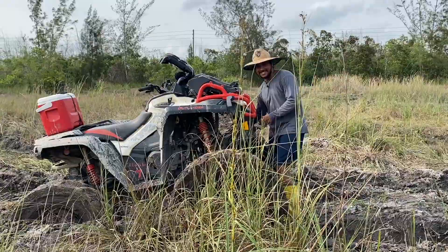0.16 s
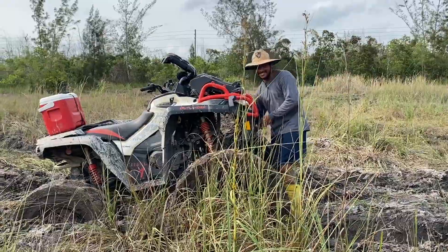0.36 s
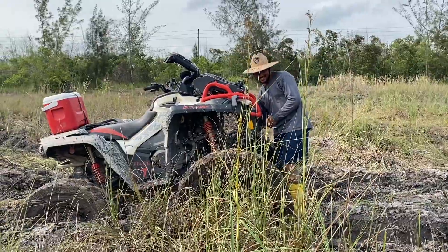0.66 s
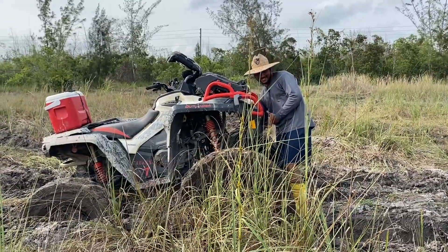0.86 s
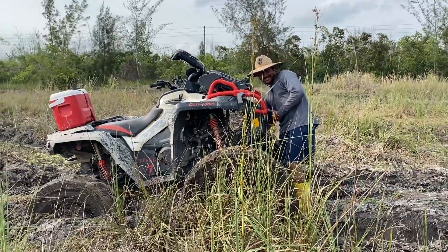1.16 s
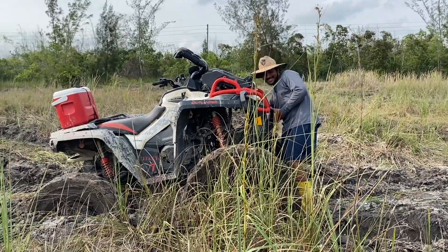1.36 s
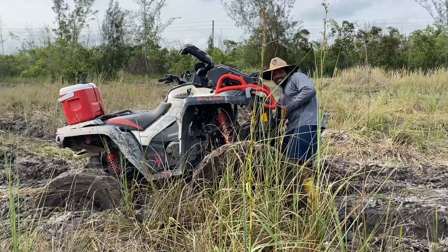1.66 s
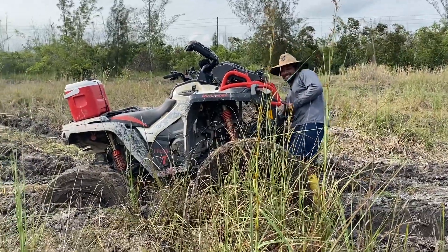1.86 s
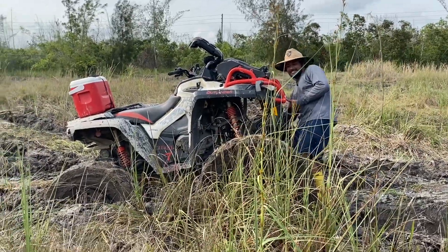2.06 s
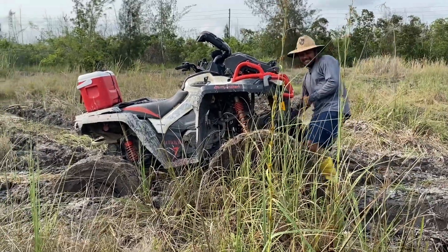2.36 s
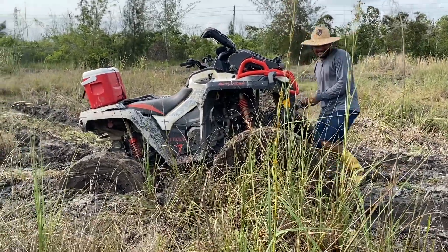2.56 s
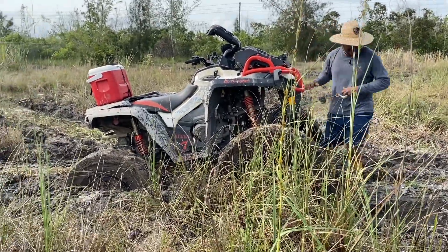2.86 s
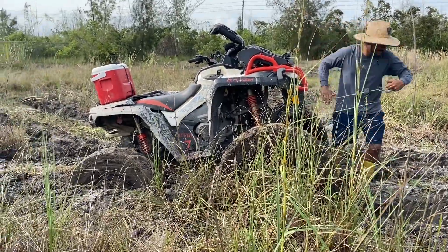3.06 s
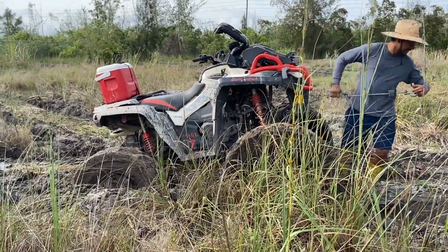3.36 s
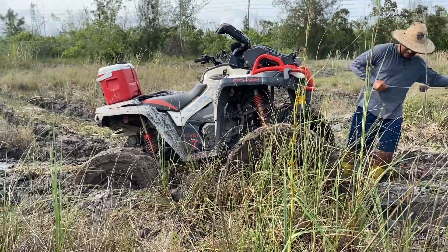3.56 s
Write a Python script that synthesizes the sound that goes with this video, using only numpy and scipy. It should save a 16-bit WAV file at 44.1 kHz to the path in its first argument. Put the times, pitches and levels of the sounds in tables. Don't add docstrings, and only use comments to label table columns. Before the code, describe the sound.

A quad bike's two-cylinder engine idles steadily a few metres away, lumpy and bassy, with valve ticks and light clatter; near the end dry grass rustles faintly. Open field, stereo handheld microphone.

```python
import sys
import numpy as np
from scipy import signal
from scipy.fft import rfft, irfft, next_fast_len
from scipy.io import wavfile
from scipy.ndimage import uniform_filter1d

SR = 44100
rng = np.random.default_rng(int(sys.argv[2]) if len(sys.argv) > 2 else 0)


def gain_from_db(level_db):
    decades = np.asarray(level_db, float) / 20
    return 10 ** decades


def store_wav(level_fs):
    pcm = np.round(np.clip(np.atleast_2d(level_fs), -1, 1) * 32767)
    wavfile.write(sys.argv[1], SR, pcm.T.astype(np.int16))


N = 163170


def unit(x):
    return x / np.sqrt(np.mean(x ** 2) + 1e-20)


def along(points, hz):
    f, v = np.transpose(points)
    return np.interp(np.log(hz + 1), np.log(f + 1), v)


def curve(rows):
    return np.interp(np.arange(N) / SR, *np.transpose(rows))


def filtered(x, response):
    m = next_fast_len(N + SR // 2)
    return irfft(rfft(x, m) * response(np.fft.rfftfreq(m, 1 / SR)), m)[..., :N]


def colored(x, spectrum):
    return filtered(x, lambda f: gain_from_db(along(spectrum, f)))


def stereo_noise():
    return rng.standard_normal((2, N))


def struck(times, gains, shape):
    train = np.bincount(np.round((times + 1) * SR).astype(int), gains, N + 2 * SR)
    return signal.fftconvolve(train, shape)[SR:SR + N]


def ring(hz, t60, attack_s):
    t = np.arange(int(.4 * SR)) / SR
    return np.sin(2 * np.pi * hz * t) * gain_from_db(-60 * t / t60) * (1 - np.exp(-t / attack_s))


def puff(attack_s, decay_s):
    t = np.arange(SR // 10) / SR
    shape = (1 - np.exp(-t / attack_s)) * np.exp(-t / decay_s)
    return shape / shape.max()


# (time [s], crank speed [rpm])
CRANK_SPEED = [(0.0, 1453), (0.108, 1415), (0.334, 1389), (0.477, 1532), (0.71, 1485), (0.899, 1384),
               (1.061, 1491), (1.15, 1437), (1.493, 1525), (1.579, 1428), (1.832, 1512), (1.877, 1459),
               (2.083, 1465), (2.306, 1489), (2.465, 1388), (2.901, 1452), (3.128, 1406), (3.7, 1497)]
CYCLE_AT_START = -.823


def cycles():
    count = CYCLE_AT_START + np.cumsum(curve(CRANK_SPEED)) / 120 / SR
    later = np.interp(np.arange(int(count[-1]) + 1), count, np.arange(N) / SR)
    step = 120 / CRANK_SPEED[0][1]
    earlier = later[0] - step * np.arange(4, 0, -1)
    return np.r_[earlier, later, later[-1] + step]


# (frequency [Hz], t60 [s], level [dB])
SILENCER_MODES = [(66, .2, .5), (94, .2, .5), (174.4, .097, 1.5), (234, .12, 3)]
# (delay [s], signed share in each of the four silencer modes)
PRESSURE_WAVES = [
    (.0018, .31, -.39, 1.21, .13),
    (.013, .32, -.07, -.69, 0),
    (.0222, .07, -.03, -.38, 0),
    (.0319, .23, -.27, .61, 0),
    (.0428, .02, .14, .28, -.17),
    (.0588, -.1, .08, .23, -.14),
]
BARK_HZ, BARK_T60, BARK_DB, BARK_S = 319, 0.18, -36.5, 0.0012
BOOM_ATTACK_S, BOOM_JITTER_S = .0041, .0003
BOOM_SCATTER_DB, MODE_SCATTER_DB = .7, 1.2
MUFFLED_HZ = 303


def exhaust(start):
    bark_size = gain_from_db(BARK_DB + 2.7 * rng.standard_normal(len(start)))
    out = struck(start + BARK_S, bark_size, ring(BARK_HZ, BARK_T60, .002))
    for delay, *shares in PRESSURE_WAVES:
        chance = rng.standard_normal((len(start), 6))
        at = start + delay + BOOM_JITTER_S * chance[:, 0]
        for k, (share, (hz, t60, db)) in enumerate(zip(shares, SILENCER_MODES)):
            scatter_db = BOOM_SCATTER_DB * chance[:, 1] + MODE_SCATTER_DB * chance[:, 2 + k]
            out = out + struck(at, share * gain_from_db(db + scatter_db), ring(hz, t60, BOOM_ATTACK_S))
    return filtered(out, lambda f: 1 / np.sqrt(1 + (f / MUFFLED_HZ) ** 12))


# (delay [s], level over 0.29 of the steady part [dB], decay [s])
GAS_PUFFS = [
    (.002, 2.5, .006),
    (0.014, 7, 0.0031),
    (0.029, 6.5, 0.0068),
    (.048, -4, .006),
    (0.072, 11, 0.0043),
]
# (frequency [Hz], level per Hz [dB])
ROAR_COLOR = [(190, -28), (330, -1), (439, -10.5), (532, -2), (1080, -12.5), (1530, -10.5), (1880, -17),
              (2590, -19.5), (5000, -28.5), (6500, -53.5), (11000, -120)]
# (frequency [Hz], width [Hz], level over the roar [dB])
HOUSING_PEAKS = [(422.7, 19, 4), (505, 31, -2), (950, 25, -0.5), (1248, 66, -1)]
ROAR_DB = -37.5


def roar(start):
    gate = 1
    for delay, db, decay in GAS_PUFFS:
        size = 0.29 * gain_from_db(db + 2 * rng.standard_normal(len(start)))
        gate = gate + struck(start + delay, size, puff(0.00089, decay))

    def housing(f):
        peaks = 1
        for center, width, db in HOUSING_PEAKS:
            peaks = peaks + gain_from_db(db) * 1j * f * width / (center ** 2 - f * f + 1j * f * width)
        return gain_from_db(along(ROAR_COLOR, f)) * peaks

    return gain_from_db(ROAR_DB) * unit(filtered(unit(gate) * stereo_noise(), housing))


# (delay [s], ring level [dB], hiss level [dB], hiss decay [s], metal part)
VALVE_TICKS = [
    (-.003, -44, -51, 0.012, 1),
    (.003, -51, -59, .008, 1),
    (0.035, -51.5, -61, 0.0037, 1),
    (0.0463, -35, -48, .006, 0),
    (.052, -42, -62.5, .006, 0),
]
# (frequency [Hz], level [dB], t60 [s])
METAL_PARTS = [
    [(2100, 3.5, 0.019), (2370, -4.5, 0.018), (2535, 1, 0.027), (2960, -6.5, .015), (3310, -5, 0.024),
     (3512, 0, 0.026), (3873, -5, 0.028), (6100, -14.5, 0.022)],
    [(2224, 5.5, 0.031), (2660, -6, 0.075), (4540, -1.5, .03), (4700, -9, .03), (5740, 1, .025),
     (5860, -9.5, 0.027)],
]
PART_SCATTER_DB = 1., 3.
# (frequency [Hz], level per Hz [dB])
HISS_COLOR = [(1500, -33), (2500, -5.5), (4500, -5), (6000, -9), (8000, -7), (12000, -10), (15500, -10.5),
              (16000, -55)]
TICK_SCATTER_DB, TICK_JITTER_S = .9, .0006
HISS_ATTACK_S, STEADY_HISS_DB = .0035, -54.5


def valves(start):
    rings, gate = np.zeros((2, N)), gain_from_db(STEADY_HISS_DB)
    for delay, ring_db, hiss_db, decay, part in VALVE_TICKS:
        part = round(part)
        chance = rng.standard_normal((len(start), 2))
        at = start + delay + TICK_JITTER_S * chance[:, 0]
        scatter_db = TICK_SCATTER_DB * chance[:, 1]
        gate = gate + struck(at, gain_from_db(hiss_db + 2.3 * scatter_db), puff(HISS_ATTACK_S, decay))
        for hz, level_db, t60 in METAL_PARTS[part]:
            own = rng.standard_normal((len(start), 3))
            size = gain_from_db(ring_db + scatter_db + level_db + PART_SCATTER_DB[part] * own[:, 2])
            rings += [struck(at, size * np.sign(own[:, k]), ring(hz, t60, 0.0011)) for k in range(2)]
    return rings + gate * unit(colored(stereo_noise(), HISS_COLOR))


# (time [s], level [dB])
PULLEY_LEVEL = [(0, -50.5), (1.4, -45.5), (2.4, -46), (3.3, -55.5), (3.7, -53.5)]
# (delay [s], level [dB])
PULLEY_BEATS = [
    (.016, 2.5),
    (.025, -3),
    (0.035, -5.5),
    (.073, -2),
    (.005, -2),
    (.058, -1.5),
]
PULLEY_HZ, PULLEY_WIDTH_HZ = 1530, 96


def pulley(start):
    gate = 0.15
    for delay, db in PULLEY_BEATS:
        size = gain_from_db(db + 2 * rng.standard_normal(len(start)))
        gate = gate + struck(start + delay, size, puff(0.0033, 0.0025))
    noise = filtered(gate * stereo_noise(), lambda f: 1 / (1 + 2j * (f - PULLEY_HZ) / PULLEY_WIDTH_HZ))
    return gain_from_db(curve(PULLEY_LEVEL)) * unit(noise)


# (frequency [Hz], level per Hz [dB])
BREEZE_COLOR = [(15, -8), (30, 2), (60, -4), (150, -20.5), (400, -50.5)]
BREEZE_DB = -37


def breeze():
    return gain_from_db(BREEZE_DB) * unit(colored(stereo_noise(), BREEZE_COLOR))


# (time [s], length [s], level [dB])
RUSTLES = [
    (2.6, 0.72, -46.5),
    (3.253, 0.57, -46.5),
]
# (time [s], level [dB], frequency [Hz])
SNAPS = [
    (.489, -22, 557),
    (2.54, -47, 6300),
    (2.956, -44, 7200),
    (3.008, -36.5, 3260),
    (4.4, -38, 6800),
    (3.5, -40, 3300),
    (3.623, -38, 3300),
]
# (frequency [Hz], level per Hz [dB])
GRASS_COLOR = [(800, -34.5), (2000, 2.5), (3500, 7.5), (6000, -6), (15000, -23)]


def grass():
    t = np.arange(N) / SR
    swell = 0
    for s, length, db in RUSTLES:
        swell = swell + gain_from_db(db) * np.sin(np.pi * np.clip((t - s) / length, 0, 1)) ** 2
    flutter = unit(uniform_filter1d(rng.standard_normal(N), size=90))
    grains = stereo_noise() * gain_from_db(6.2 * np.clip(flutter, -2, 2))
    out = swell * unit(colored(grains, GRASS_COLOR))
    for s, db, hz in SNAPS:
        burst = struck(np.array([s]), np.ones(1), puff(0.00085, 0.0078)) * stereo_noise()
        out = out + gain_from_db(db + 13) * filtered(burst, lambda f: 1 / (1 + ((f - hz) / (0.18 * hz)) ** 2))
    return out


# (frequency [Hz], correlation [-1..1])
PORTS_ALIKE = [(60, 1), (300, 0.91), (640, 0.74), (1400, 0.77), (3000, 0.79), (5000, 0.3), (7500, 1),
               (15000, 1)]
# (frequency [Hz], left minus right [dB])
LEFT_LEAN = [(60, -0.5), (180, 3), (550, 3.0), (1650, 2), (4970, 0.0), (15000, 0.0)]
# (frequency [Hz], phase [rad])
LEFT_LEAD = [(60, .02), (300, 0.033), (1460, .7), (2400, 0.71), (4570, 0.69)]
PORTS_IN_STEP_HZ, PORT_LAG_S, LAG_FROM_HZ = 11200, .000227, 5300


def ports(pair):
    def mix(f):
        angle = np.arccos(np.clip(along(PORTS_ALIKE, f), -1, 1)) / 2
        return np.array([np.cos(angle), np.sin(angle)])

    half = np.array([[.5], [-.5]])

    def offset(f):
        delay_phase = 2 * np.pi * (PORTS_IN_STEP_HZ - f) * PORT_LAG_S
        lead = np.where(f < LAG_FROM_HZ, along(LEFT_LEAD, f), delay_phase)
        return gain_from_db(half * along(LEFT_LEAN, f)) * np.exp(1j * half * lead)

    mid, side = filtered(pair, mix)
    return filtered(np.array([mid + side, mid - side]), offset)


# (time [s], level [dB])
NEARNESS = [(0, -1.5), (.6, -1), (1.4, -0.5), (2.3, 0), (3.7, .3)]
BRIGHT_GROWS = 1.8


def scene():
    start, near_db = cycles(), curve(NEARNESS)
    boom = exhaust(start) * gain_from_db(near_db)
    boom_pair = np.array([boom, np.roll(boom, 400)])
    engine_top = (roar(start) + valves(start)) * gain_from_db(BRIGHT_GROWS * near_db)
    return ports(boom_pair + engine_top + pulley(start) + breeze() + grass())


def band_limit(x):
    return signal.sosfilt(signal.butter(12, 16920, fs=SR, output="sos"), x)


BASS_HZ, TOP_HZ, CEILING = 35, 15830, 1.


def record(dry):
    def microphone(f):
        r = f / BASS_HZ
        return (f < TOP_HZ) * (1j * r) ** 2 / (1 + 1.4j * r - r ** 2)

    cut = filtered(dry, microphone)
    mix = cut / (1 + np.abs(cut / CEILING) ** 6) ** (1 / 6)
    return band_limit(mix)


dry = scene()
out = record(dry)
store_wav(out)
```